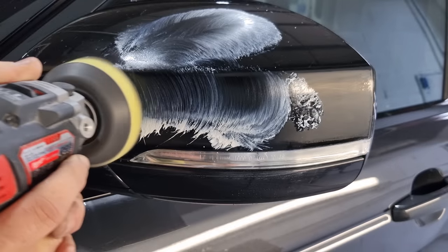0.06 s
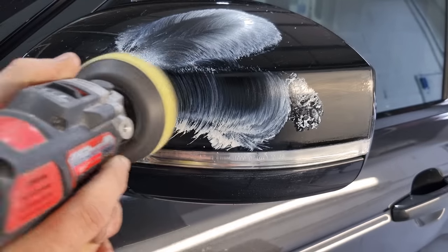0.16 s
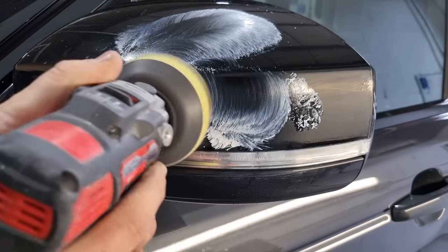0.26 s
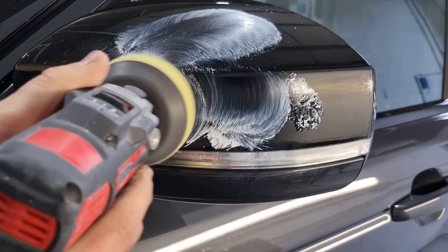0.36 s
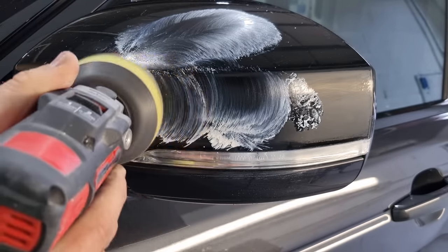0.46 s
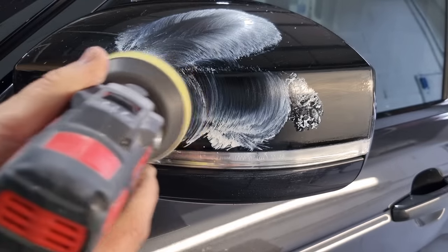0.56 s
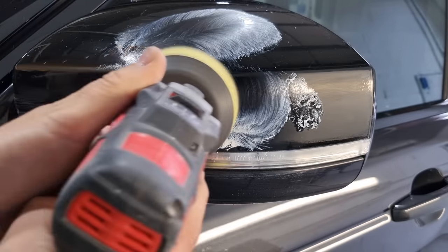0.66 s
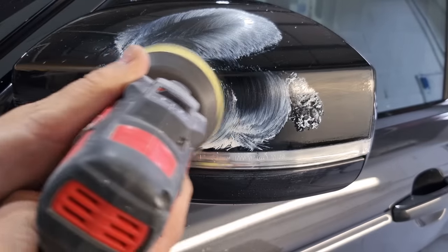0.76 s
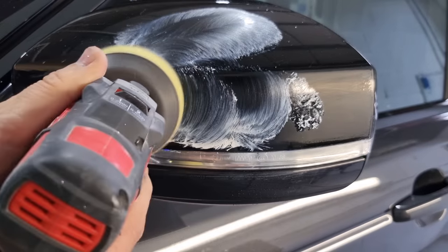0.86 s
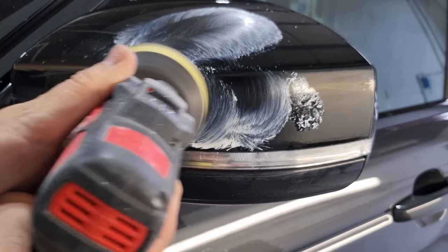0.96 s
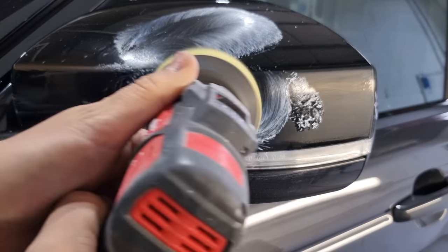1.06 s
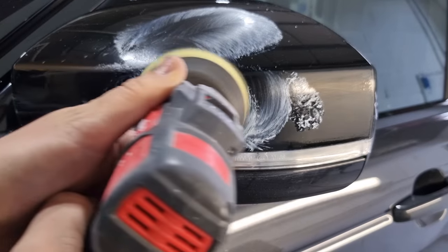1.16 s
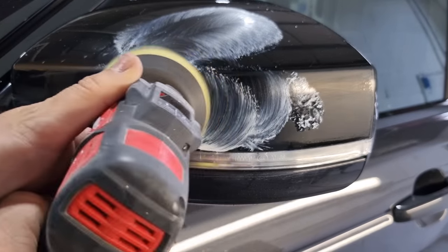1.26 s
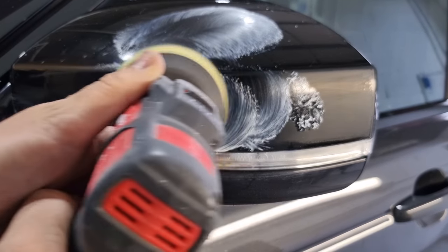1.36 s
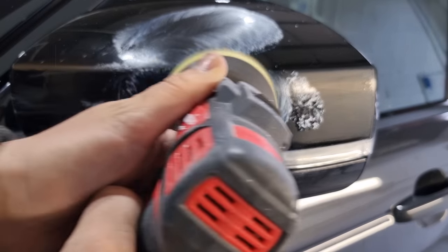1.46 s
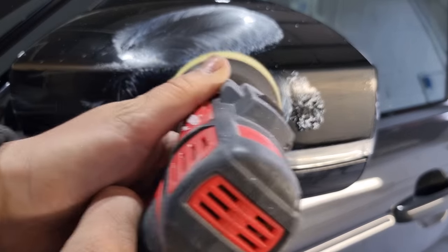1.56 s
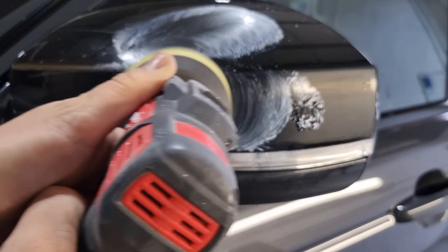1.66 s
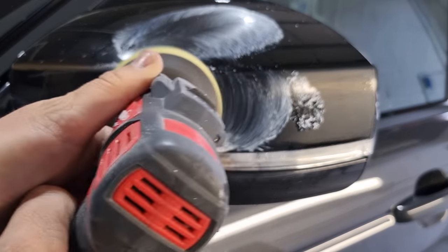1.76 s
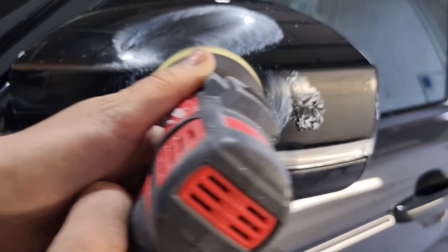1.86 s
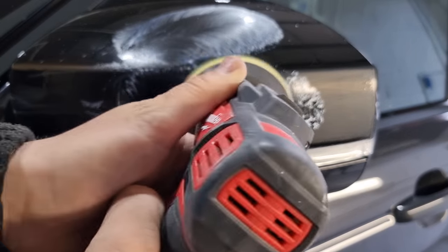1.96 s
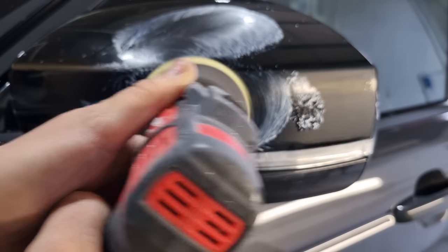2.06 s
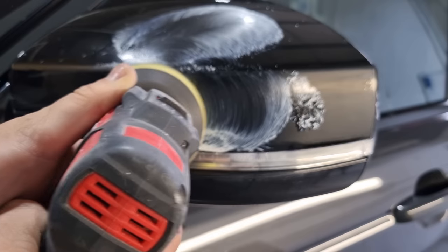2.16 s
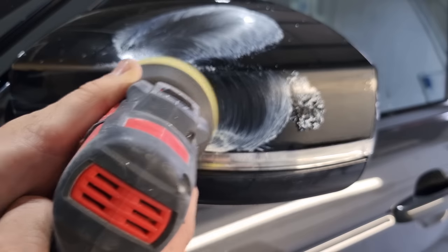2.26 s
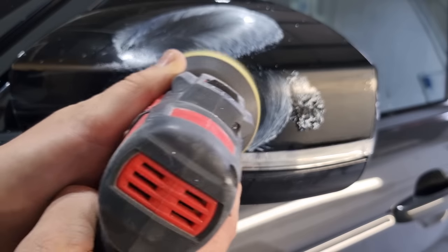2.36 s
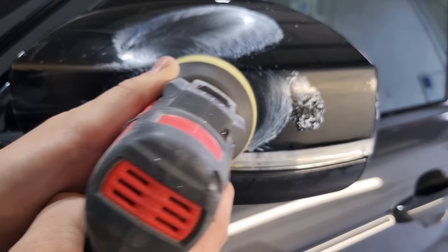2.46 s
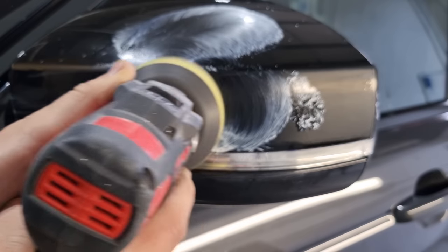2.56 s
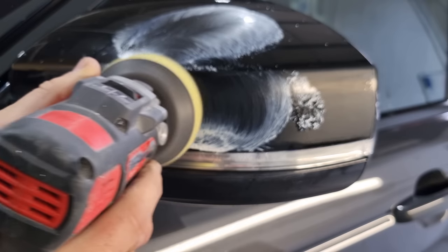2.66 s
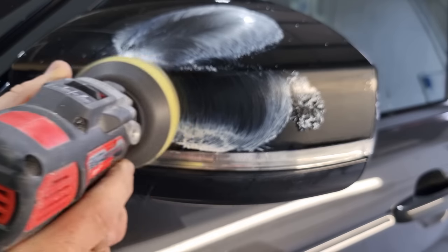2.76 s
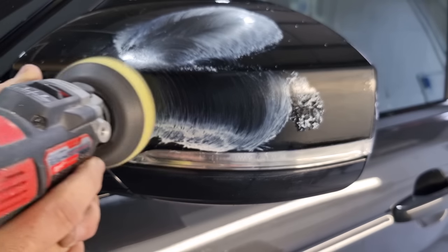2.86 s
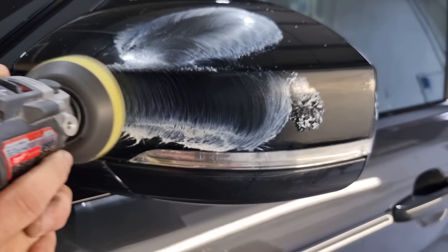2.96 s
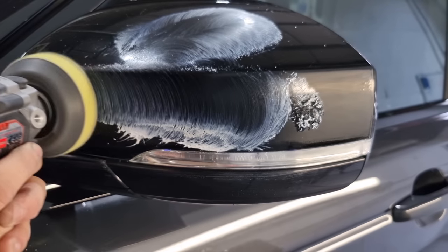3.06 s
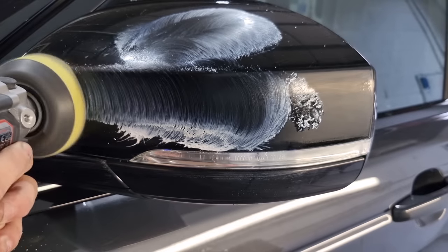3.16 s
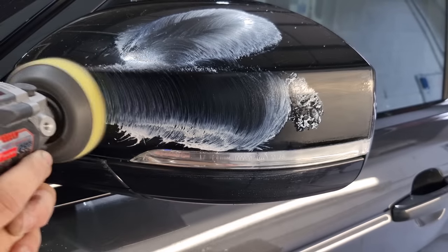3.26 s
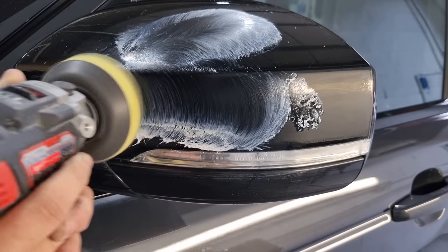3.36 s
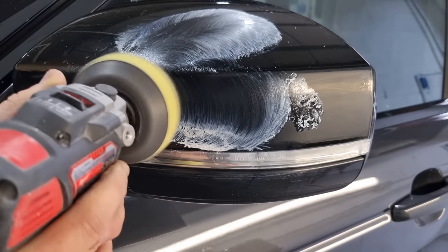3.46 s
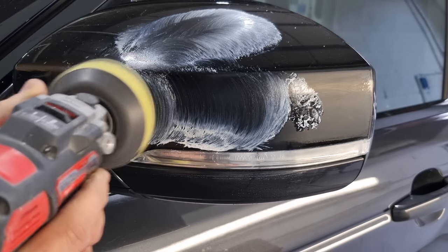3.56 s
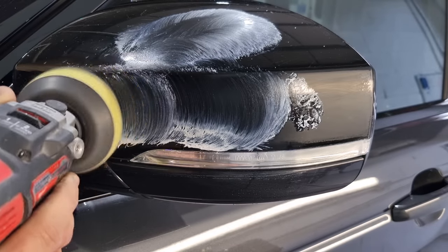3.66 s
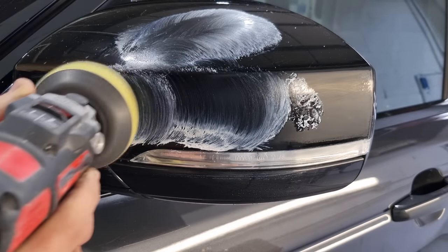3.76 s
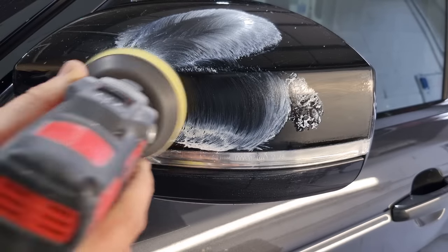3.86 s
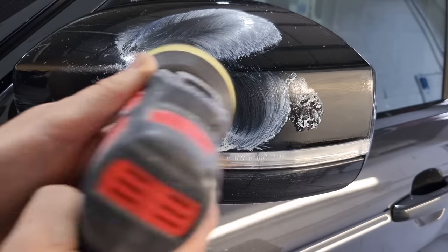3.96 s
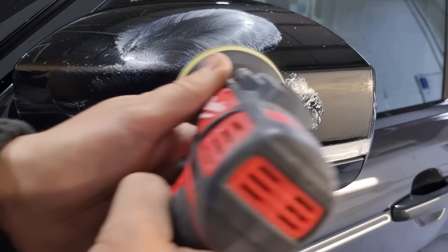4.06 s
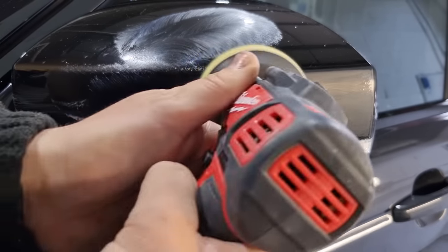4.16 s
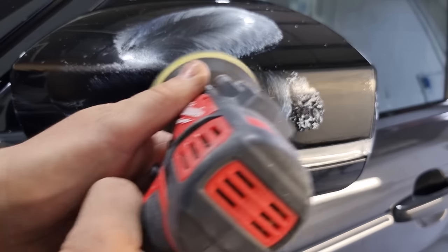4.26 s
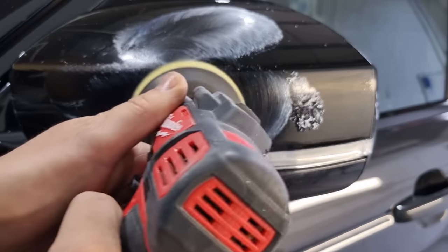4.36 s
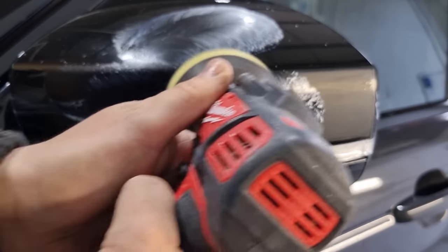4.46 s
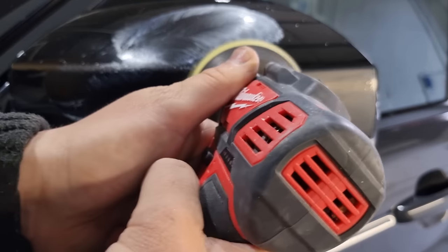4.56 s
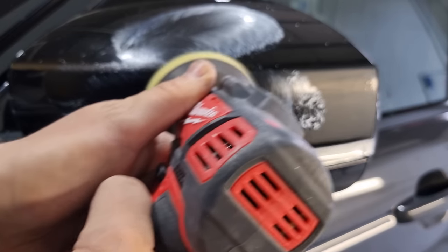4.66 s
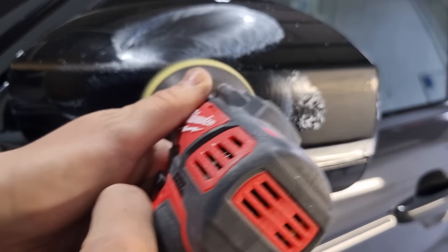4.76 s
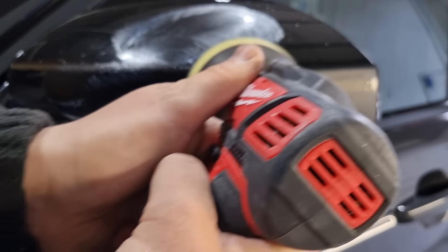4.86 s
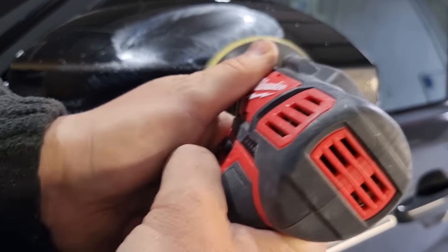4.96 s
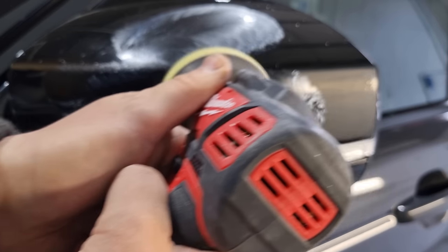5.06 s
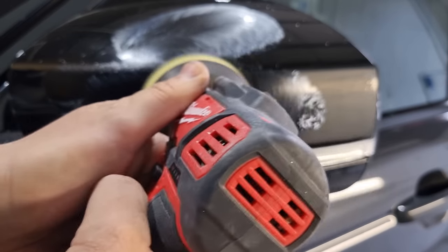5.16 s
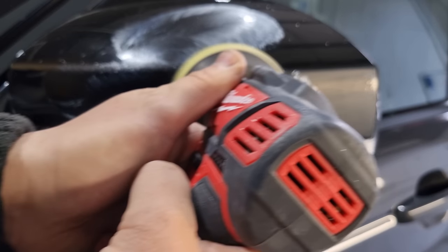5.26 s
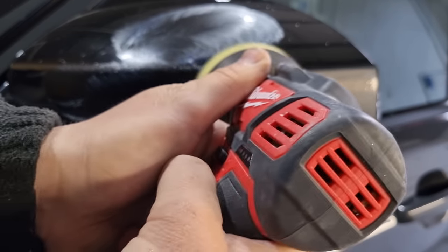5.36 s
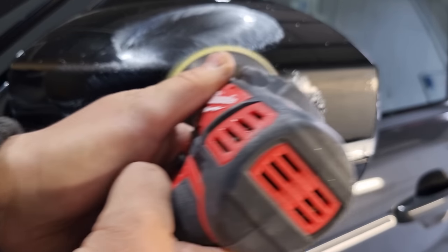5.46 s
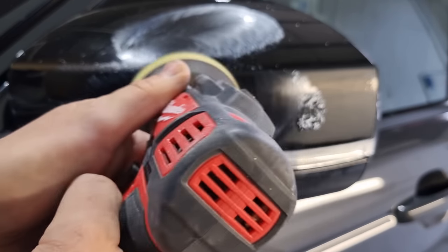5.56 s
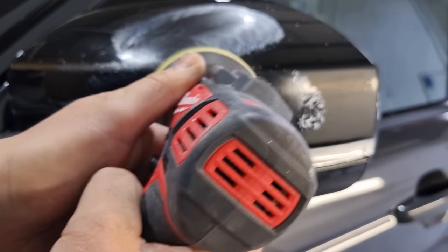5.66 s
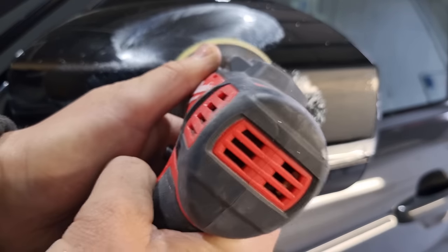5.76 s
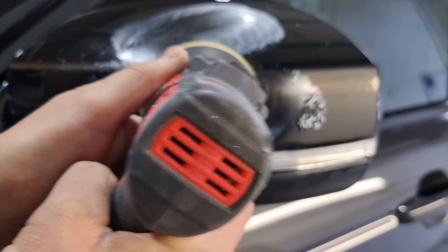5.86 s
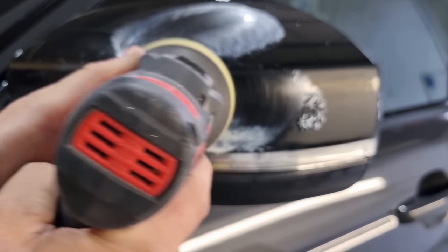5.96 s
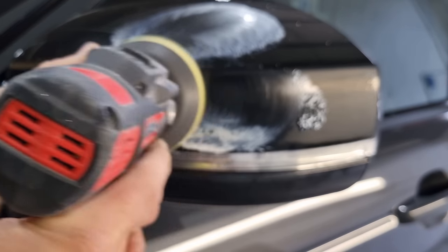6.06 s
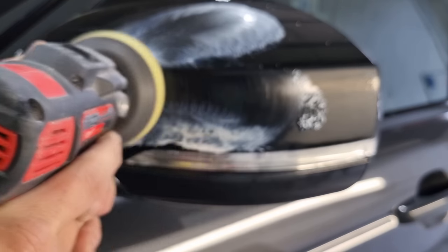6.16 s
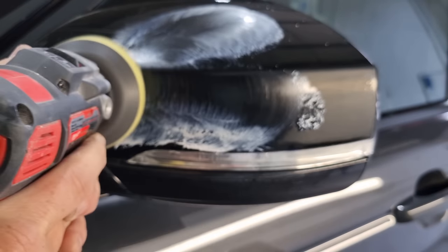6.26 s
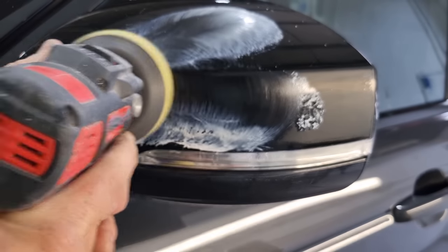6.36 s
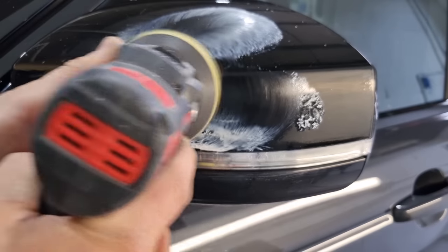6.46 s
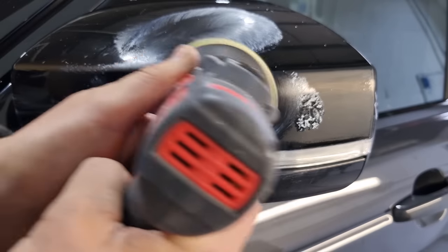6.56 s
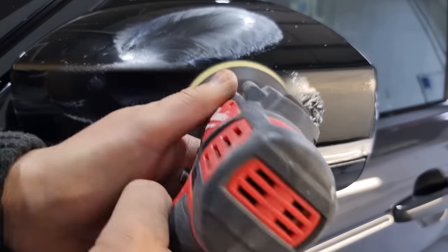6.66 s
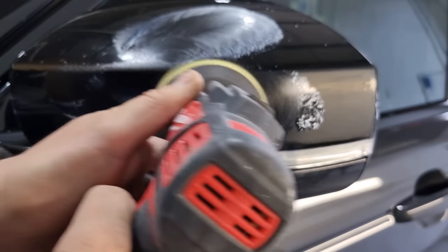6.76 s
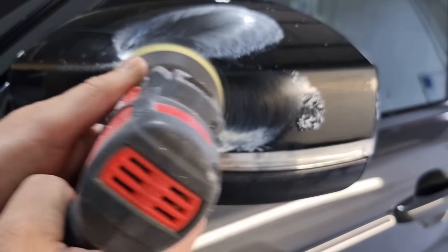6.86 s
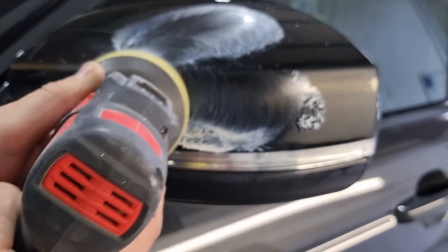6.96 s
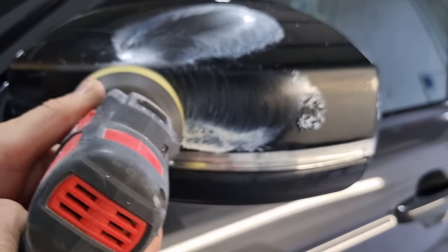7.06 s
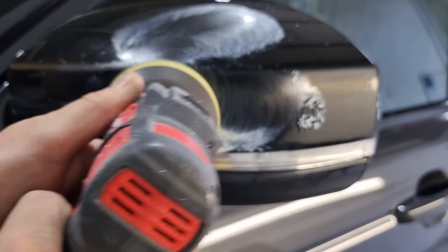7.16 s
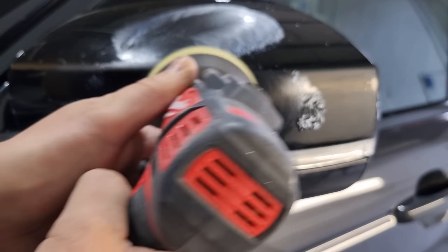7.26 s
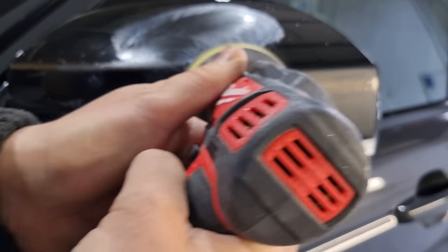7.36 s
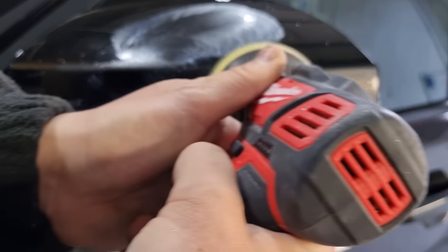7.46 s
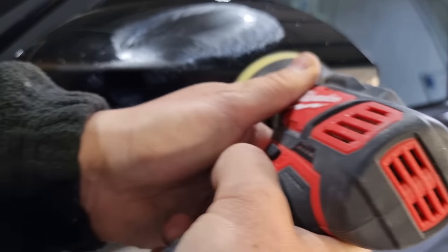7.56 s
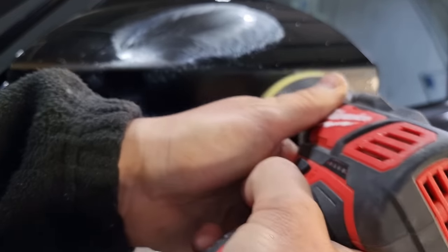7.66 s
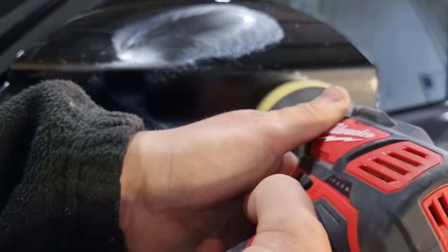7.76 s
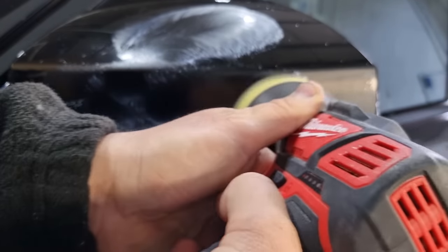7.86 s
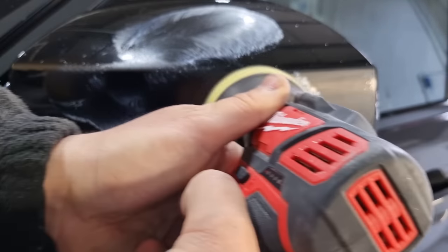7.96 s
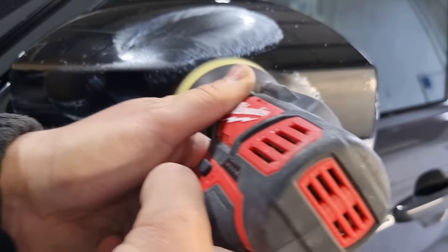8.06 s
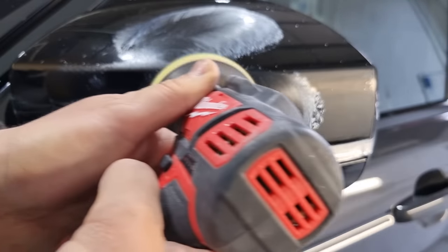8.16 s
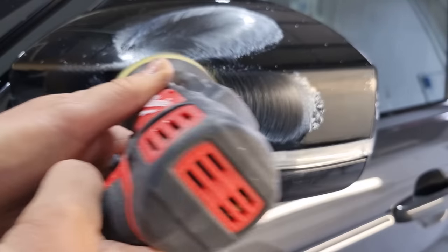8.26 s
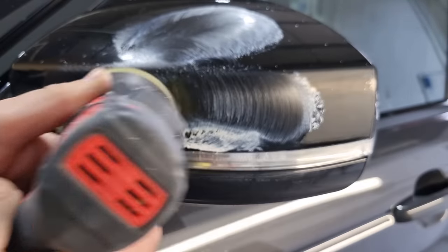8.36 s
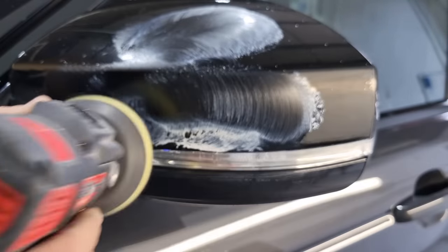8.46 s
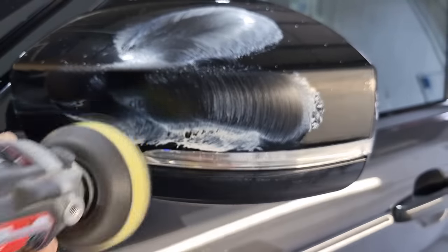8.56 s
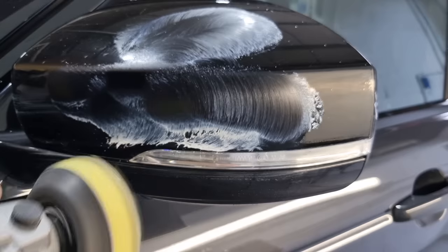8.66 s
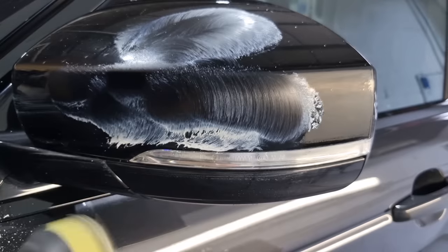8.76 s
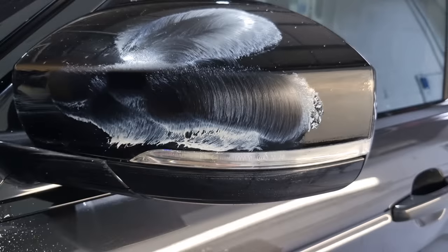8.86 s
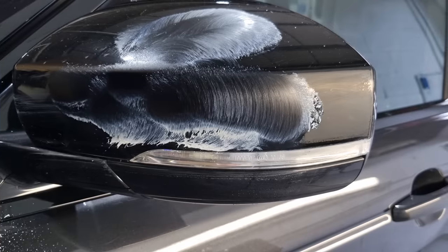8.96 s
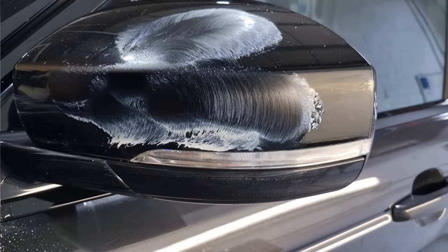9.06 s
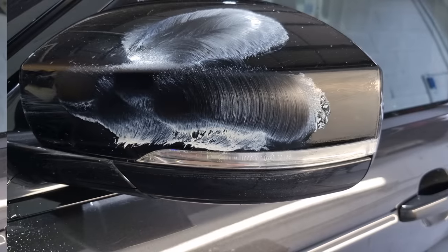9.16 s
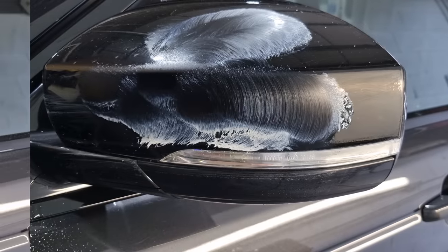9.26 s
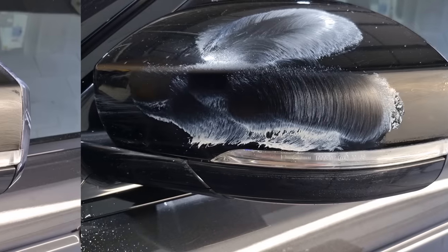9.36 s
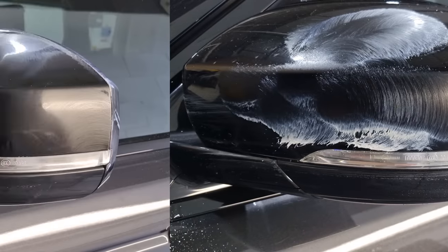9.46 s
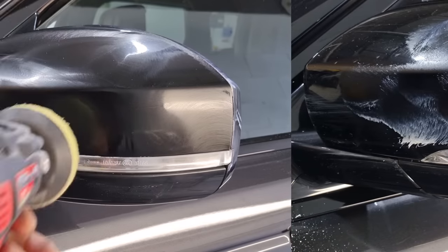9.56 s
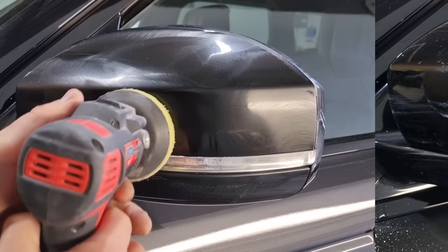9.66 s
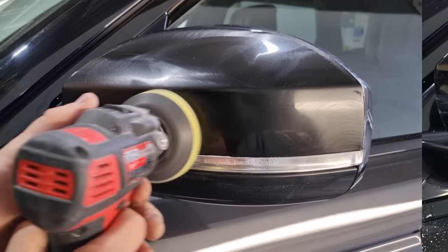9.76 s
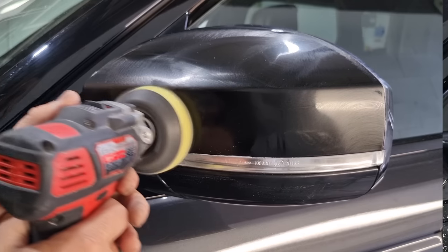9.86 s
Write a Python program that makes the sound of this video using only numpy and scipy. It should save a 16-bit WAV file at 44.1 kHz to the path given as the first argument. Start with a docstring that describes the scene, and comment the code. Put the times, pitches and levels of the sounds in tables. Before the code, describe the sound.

Nearly constant high motor whirr from a handheld buffing tool, heard at close range indoors. Small pitch dips and gentle fluttering follow the pad strokes over painted metal. Near the end the pad edge hisses as it lifts away, the motor quickly slows through falling tones to rest, and only low distant room rumble remains. A few dry handling clicks come before an abrupt restart at a slower speed.

```python
"""The whir of a small cordless polisher is heard first, close to a two-port microphone, buffing painted metal in a
workshop. Its motor orders, pad throb and commutator tones are sines locked to the shaft angle; its brush, gear and
fan noise is filtered noise, modulated by shaft and pad and ringing in the housing. Each push of the pad lowers the
speed. Switched off, it coasts to rest; after a few trigger clicks it spins up again at a lower speed."""
import sys
import numpy as np
from scipy import signal
from scipy.fft import rfft, irfft, next_fast_len
from scipy.io import wavfile
from scipy.ndimage import uniform_filter1d, map_coordinates

SR = 44100
rng = np.random.default_rng(int(sys.argv[2]) if len(sys.argv) > 2 else 0)


def materialize(psi):
    """Save the field psi as 16-bit PCM at rate SR to the path in sys.argv[1].

    A 1-D psi becomes a single channel; in a 2-D psi each row is a channel.
    """
    bounded = np.clip(np.atleast_2d(psi).T, -1, 1)
    quanta = np.round(bounded * 32767).astype(np.int16)
    wavfile.write(sys.argv[1], SR, quanta)


N = 437031

OFF_S, ON_S = 8.293, 9.733  # trigger let go, pressed again
FREE_HZ = 361.5  # shaft turns per second with the pad barely touching


def amp(db):
    """Level to amplitude: 20 dB is a factor of ten."""
    return 10 ** (np.asarray(db) / 20)


def unit(x):
    """Normalisation to a root-mean-square of 1."""
    return x / np.sqrt(np.mean(x ** 2) + 1e-20)


def along(points, hz):
    """Spectral interpolation of (f/Hz, value) points on a logarithmic frequency axis."""
    f, v = np.transpose(points)
    return np.interp(np.log(hz + 1), np.log(f + 1), v)


def curves(rows):
    """Linear interpolation in time: one value per sample for each column after t/s."""
    s, *columns = np.transpose(rows)
    return [np.interp(np.arange(N) / SR, s, column) for column in columns]


def wobble(rate):
    """Slow random fluctuation: a smooth curve through `rate` random knots a second."""
    coarse = np.arange(0, N + 64, 64)
    knots = rng.standard_normal(int(N * rate / SR) + 4)
    return np.interp(np.arange(N), coarse, map_coordinates(knots, [coarse * rate / SR]))


def filtered(x, response):
    """Linear filtering: the spectrum of x is multiplied by a complex response of frequency."""
    m = next_fast_len(N + 8192)
    return irfft(rfft(x, m) * response(np.fft.rfftfreq(m, 1 / SR)), m)[..., :N]


def noise(patchy_db):
    """Non-stationary noise: two unrelated white noises share one time-frequency field of random gains."""
    z = signal.stft(rng.standard_normal((2, N)), nperseg=512)[2]
    field = uniform_filter1d(rng.standard_normal(z.shape[1:]), size=6, axis=0)
    field = uniform_filter1d(field, size=14, axis=1)
    return signal.istft(z * amp(patchy_db * unit(field)), nperseg=512)[1][:, :N]


def ports(pair):
    """Spatial coherence: a shared and an unshared signal reach two ports, unlike in phase and level."""
    # likeness of the ports for a pair of equal power: f/Hz, coherence
    alike = [(60, 0.23), (200, 0.98), (350, 0.64), (800, 1), (1400, 0.74), (1900, 0.2), (3700, 0.57),
             (7000, 0.15), (11000, 0.27), (12700, 1), (15000, 0.54)]
    # phase by which the left port leads: f/Hz, lead/rad
    lead = [(1, 1.5), (170, 0), (290, 1.7), (600, 2), (1120, 2), (2240, 3), (2670, 5), (2930, 4.5),
            (4820, 5), (5600, 3.5), (6370, 6.5), (8000, 5.5), (15700, 7)]
    # level difference of the ports: f/Hz, left minus right/dB
    lean = [(60, -3), (150, -6.5), (380, 9.5), (950, 4), (2380, 1), (5980, 1.5), (15000, 3)]

    def split(hz):
        turn = np.arccos(np.clip(along(alike, hz), 0, 1)) / 2
        return np.array([np.cos(turn), np.sin(turn)])

    shared, own = filtered(pair, split)
    side = np.array([[1], [-1]])

    def offset(hz):
        return amp(side * along(lean, hz) / 2) * np.exp(.5j * side * along(lead, hz))

    return filtered(shared + side * own, offset)


def workshop():
    """Coherent and incoherent noise: distant rumble, nearly alike at both ports, over faint unrelated air."""
    # spectrum of the rumble: f/Hz, relative level/dB
    rumble_colour = [(15, -26), (32, 0), (44, -17), (62, 6.5), (88, -6.5), (150, -15.5), (300, -12.5),
                     (480, -41)]
    # rise and fall of the rumble: t/s, level/dB
    swell = [(0, -53), (8.6, -57.5), (9.0, -59), (9.35, -61.5), (9.55, -56), (9.75, -52), (9.91, -51)]
    # spectrum of the workshop air: f/Hz, relative level/dB
    air_colour = [(200, -36), (400, -12.5), (650, -11.5), (1560, -35.5), (3300, -20.5), (8000, -42),
                  (16000, -39)]
    mid, side = filtered(noise(patchy_db=1), lambda hz: amp(along(rumble_colour, hz))) * [[1], [.3]]
    rumble = unit(np.array([mid + side, mid - side]))
    air = unit(filtered(noise(patchy_db=1.5), lambda hz: amp(along(air_colour, hz))))
    return amp(curves(swell)[0]) * rumble + amp(-62.5) * air


def clicks():
    """Damped resonance: each touch is a short puff of noise in one broad resonance of grip or switch."""
    # handling and trigger: t/s, level before the onset ramp and decay/dB, centre f/Hz, width/Hz, t60/s
    touches = [(9.477, -35.5, 663, 260, 0.04), (9.548, -47, 550, 600, 0.08),
               (9.640, -29, 2280, 2500, 0.051), (9.643, -43, 2750, 4000, 0.011),
               (9.677, -33, 1100, 2200, 0.036), (9.679, -44, 292, 120, .08),
               (9.683, -44, 3000, 8000, 0.021), (9.738, -34, 3030, 9000, 0.016),
               (9.746, -41, 285, 110, 0.18)]
    out, t = np.zeros(N + SR), np.arange(SR // 10) / SR
    f = np.fft.rfftfreq(len(t), 1 / SR)
    for s, db, hz, width_hz, t60 in touches:
        band = 1j * f * width_hz / (hz * hz - f * f + 1j * f * width_hz)
        puff = unit(irfft(rfft(rng.standard_normal(len(t))) * band ** 2))
        onset = 1 - np.exp(-t / .001)
        out[round(s * SR):][:len(t)] += amp(db - 60 * t / t60) * onset * puff
    return out[:N]


def shaft():
    """Torque balance: the shaft sags under each push, is braked by friction and fan, then spins up (turns/s)."""
    # pushes of the pad onto the paint: t/s, sag of shaft speed/Hz, half length/s
    pushes = [(0, 9, .25), (.33, 4, .2), (.57, 6, .17), (.96, 8.5, .2), (1.37, 10.5, .23),
              (1.82, 11.5, .23), (2.26, 11, .24), (2.66, 8, .2), (2.87, 7, .25), (3.14, 16.5, .24),
              (3.38, 11, .22), (3.76, 12, .33), (4.13, 3.5, .15), (4.45, 12.5, .2), (4.83, 15, .22),
              (5.24, 10.5, .21), (5.66, 11, .19), (6.05, 4, .2), (6.33, 16, .33), (6.9, 13, .28),
              (7.15, 11, .22), (7.73, 12, .18), (8.27, 13, .42)]
    friction_hz_per_s, drag_equal_hz = 228, 253  # bearing braking; speed at which the fan brakes as hard
    slow_hz, spin_up_s, spin_up_bend = 291, .05, .6  # second run: speed, time constant, exponent
    t = np.arange(N) / SR
    run = FREE_HZ
    for s, sag_hz, half in pushes:
        run = run - sag_hz * np.cos(np.pi / 2 * np.clip((t - s) / half, -1, 1)) ** 2
    # constant friction plus drag as speed squared gives a tangent law
    start_angle = np.arctan(run[round(OFF_S * SR)] / drag_equal_hz)
    angle = start_angle - friction_hz_per_s / drag_equal_hz * (t - OFF_S)
    coast = drag_equal_hz * np.tan(np.clip(angle, 0, 1))
    again = slow_hz * (1 - np.exp(-np.maximum(t - ON_S, 0) / spin_up_s)) ** spin_up_bend
    return np.where(t < OFF_S, run, np.where(t < ON_S, coast, again))


def state(speed):
    """Level superposition: the seven factors on which decibel levels depend linearly, and dB of distance."""
    # how the tool is held: t/s, flank towards the microphone (0-1), rear vents towards it (0-1)
    hold = [(0, 0.6, 0), (.7, 0.18, 0.13), (1.3, 0.05, 0.2), (1.8, 0.07, 0.33), (2.3, 0.15, 0.34),
            (2.7, 0.32, 0.03), (3.1, 0.69, 0.1), (3.6, 0.45, 0.13), (3.9, 0.35, 0.15), (4.2, 0.06, 0.6),
            (4.5, 0.1, 0.67), (5, 0.12, 0.94), (5.4, 0.13, 0.78), (5.8, 0.15, 0.62), (6.25, 0.45, 0.03),
            (6.8, 0.13, 0.54), (7.15, 0.26, 0.32), (7.5, 0.07, 0.78), (7.95, 0.19, 0.81), (8.2, 0.03, 0.97)]
    current_dies_s = 0.32  # time constant after switch-off
    away_s, away_db_per_s = 8.11, 8.5  # the tool is carried off
    t = np.arange(N) / SR
    first, again = t < OFF_S, t >= ON_S
    off = ~again * (1 - np.exp(-np.maximum(t - OFF_S, 0) / current_dies_s))
    flank, vents = curves(hold)
    load = first * (1 - np.clip(flank, 0, 1)) * (FREE_HZ - speed) / 10  # heard less from the flank
    halvings = np.log2(FREE_HZ / np.maximum(speed, 2))
    away_db = -away_db_per_s * np.maximum(t - away_s, 0) * ~again
    return np.array([np.ones(N), flank, vents, load, halvings, off, again]), away_db


def modulators(turns):
    """Amplitude modulation: pad throb at a tenth of shaft speed, shaft chop, random crackle and a slow drift."""
    throb = np.cos(2 * np.pi * turns / 10) + .5 * np.cos(2 * np.pi * turns / 5 + 0.72)
    chop = np.cos(4 * np.pi * turns) + 0.5 * np.cos(6 * np.pi * turns + 2.0)
    hits = (rng.random(N) < 400 / SR) * rng.random(N)  # 400 a second on average
    crackle = signal.lfilter([1], [1, -np.exp(-1 / (0.0018 * SR))], hits)  # decay constant 1.8 ms
    return throb, chop, crackle, wobble(11)


def layer(colour, level_db, beat, by_pad, by_crackle):
    """Source and filter: modulated noise shaped by a spectrum and set to a level that drifts a little."""
    throb, chop, crackle, drift = beat
    drive = noise(patchy_db=1.2) * (1 + by_pad * throb + 0.16 * chop + by_crackle * crackle)
    shaped = unit(filtered(drive, lambda hz: amp(along(colour, hz))))
    return amp(level_db + 0.48 * drift) * shaped


def hands(beat):
    """Friction noise: hands rustle as a broad band, roughened by the same random crackle as the motor noise."""
    # hands on the resting tool: t/s, level/dB
    rustle = [(9.3, -66.5), (9.45, -66), (9.53, -73), (9.6, -55), (9.7, -49), (9.725, -51), (9.75, -64)]
    # spectrum of the rustle: f/Hz, relative level/dB
    cloth = [(350, -36), (600, -9), (744, -16), (1010, -7), (2340, -5), (10300, -28), (15000, -30)]
    return layer(cloth, curves(rustle)[0], beat, by_pad=0, by_crackle=.6)


def pad_edge(beat):
    """Friction noise: the pad's edge hisses as it comes off the paint."""
    # lift-off: t/s, level/dB
    lift_off = [(7.9, -60), (8.05, -28), (8.14, -26), (8.28, -29), (8.35, -45), (8.5, -80)]
    # spectrum of the hiss: f/Hz, relative level/dB
    edge = [(3000, -48), (4200, -5.5), (5500, -6), (6600, -2), (7300, -8), (9000, -36)]
    return layer(edge, curves(lift_off)[0], beat, by_pad=.05, by_crackle=.4)


def coasting_noise(beat):
    """Rolling and meshing noise: the free bearings whirr in two bands and the slowing gears murmur."""
    # whirr of the bearings: t/s, level of its body/dB, level of its upper band/dB
    coasting = [(8.3, -70, -60), (8.4, -50, -38), (8.5, -45, -35), (8.55, -35, -40), (8.62, -31.5, -35),
                (8.72, -33.5, -42), (8.85, -39.5, -47.5), (8.92, -44, -51), (8.97, -58, -48),
                (9.01, -50, -46), (9.08, -62, -53), (9.16, -66, -52.5), (9.22, -68, -64), (9.4, -88, -91)]
    # murmur of the gears: t/s, level/dB
    slowing = [(8.3, -60), (8.5, -40), (8.7, -52), (8.9, -53), (9.05, -56), (9.17, -55), (9.3, -74),
               (9.45, -85)]
    # spectra of body, upper band and murmur: f/Hz, relative level/dB
    body = [(1500, -43), (2000, -7), (2500, -2), (2900, 0.5), (3150, 0.5), (3400, -16), (4000, -46)]
    upper = [(3000, -34), (3450, -4.5), (3850, -1.5), (4150, -8.5), (5000, -41)]
    murmur = [(300, -32), (550, -6), (800, 0), (1050, 1), (1200, -16), (1500, -36)]
    levels = [*curves(coasting), *curves(slowing)]
    return sum(layer(colour, db, beat, .15, .4) for colour, db in zip([body, upper, murmur], levels))


def gliding_orders(turns):
    """Falling tones: shaft orders fade in and out one after another as the motor slows, as listed."""
    # glides: multiple of shaft speed, start t/s, end t/s, first level/dB, last level/dB
    glides = [(2, 8.33, 8.44, -33, -50), (3, 8.36, 8.62, -30, -45), (3, 8.66, 8.78, -49, -53),
              (18, 8.36, 8.46, -33, -40), (4, 8.43, 8.59, -45, -49), (5, 8.57, 8.63, -42, -43),
              (6, 8.66, 8.72, -44, -45), (6, 8.74, 8.83, -47, -51), (5, 8.78, 8.89, -51, -53),
              (9, 8.79, 8.93, -43, -46), (6, 8.85, 8.99, -44, -55), (12, 8.91, 9.03, -49, -55),
              (15, 8.97, 9.1, -50, -55)]
    fade_s = .02
    t, out = np.arange(N) / SR, 0
    for k, start, end, first_db, last_db in glides:
        fade = np.clip(np.minimum(t - start, end - t) / fade_s, 0, 1)
        level_db = np.interp(t, [start, end], [first_db, last_db]) + 1.8 * wobble(25)
        out = out + fade * amp(level_db) * np.sin(2 * np.pi * (k * turns + .06 * wobble(40)))
    return out


def rotor(beat, now, away_db):
    """Resonant radiation: brush, gear and fan noise rings in the housing; returns vent ring and the rest."""
    # spectra of the seven layers: f/Hz, relative level/dB
    growl = [(150, -39), (250, -18.5), (500, -14.5), (850, -3), (1000, -4.5), (1200, 0), (1350, 3),
             (1600, -49)]
    drone = [(1200, -51), (1400, -0.5), (1500, 2.5), (1700, -3), (1800, -2.5), (2100, -67)]
    buzz = [(1500, -44), (1800, -2), (1950, 0), (2400, -1.5), (3300, -23), (4500, -35)]
    ring = [(2200, -56), (2560, 4), (2660, 7), (2760, 2), (3000, 2.5), (3200, -3), (3600, -53)]
    upper_ring = [(2600, -35), (2750, -2), (2830, 9.5), (2900, -6), (3050, -28.5)]
    rasp = [(2500, -37), (3300, 0.5), (3800, 0), (4600, -4), (5400, -3.5), (6300, -3.5), (7000, -8),
            (8000, -13), (10000, -69)]
    hiss = [(6000, -78), (8200, -6.5), (9200, -6), (10500, -6), (11500, -3.5), (12400, 2.5), (13300, 1.5),
            (15500, -7), (16500, -9.5)]
    # one row per layer, in that order: level at free speed/dB, flank on/dB, vents on/dB,
    # per 10 Hz of sag/dB, per halved speed/dB, without current/dB, in the second run/dB
    rules = [(-32.5, -3, 3, 1, -4, -10, -5), (-27.5, -18, 0, 0, -6.5, -11, -9),
             (-27, -5, 1, 0, -6, -6.5, -6.5), (-30, 3.5, 2.5, 0.075, -5, -9, -14),
             (-39, 15, 9, 0, -8, -10, -15), (-25.5, -2.5, 0.5, 1, -6.5, -9.5, -5.5),
             (-27, -6, 1, 0.088, -7.5, -10, -8.5)]
    surge_db, surge_s = 8.5, 0.021  # starting current: level and time constant
    surge = surge_db * now[-1] * np.exp(-np.abs(np.arange(N) / SR - ON_S) / surge_s)
    levels = np.dot(rules, now) + away_db + surge
    # spectrum, depth of pad throb, depth of crackle
    layers = [(growl, .04, .15), (drone, .04, .2), (buzz, .04, .2), (ring, .05, .3),
              (upper_ring, .05, .3), (rasp, .05, .4), (hiss, .04, .4)]
    out = [layer(colour, db, beat, by_pad, by_crackle)
           for db, (colour, by_pad, by_crackle) in zip(levels, layers)]
    vent_ring = out.pop(3) + out.pop(3)
    return vent_ring, sum(out)


def tones(speed, turns, now):
    """Order analysis: slightly unsteady sines at multiples of shaft speed, strong, low and commutator orders."""
    # 1st, 2nd and 3rd order: level at free speed/dB, flank on/dB, vents on/dB,
    # per 10 Hz of sag/dB, per halved speed/dB, without current/dB, in the second run/dB
    orders = [(-31, -15, -1, 0, -26, -1, -3), (-33, -1, -10, 1, -20, -16, 3), (-43, 4, 7, -1, -14, -25, 8)]
    # pad unbalance and by-tones: multiple, level at full speed/dB, flank on/dB, vents on/dB, blur/Hz
    by_tones = [(.1, -50.5, -2, 0, .5), (.2, -49.5, -5, 0, .5), (.73, -62, 15, 0, 9), (.89, -58, 16, 0, 7),
                (1.1, -56, 8, 0, 7), (2.6, -47, -4, 7, 6), (3.23, -40, -5, 7.5, 2), (3.46, -43, -4, 6, 10),
                (4, -43, 2, -6, 4)]
    # the casing's response to the by-tones: f/Hz, relative level/dB
    panel = [(1080, 0), (1125, -9), (1160, 2), (1200, 0)]
    # commutator and fan orders: multiple, level/dB, flank on/dB, per 10 Hz of sag/dB
    whine_orders = [(9, -37, 14, -1), (12, -33, -13, 5.5), (14, -32.5, -12, 1), (15, -38, -9, 0),
                    (17, -39, -8, 0)]
    # level change common to these orders, same columns as the 1st to 3rd order
    whine_rule = (0, 0, -7, 0, -30, -4, -5)
    body_hz = 250  # the small body hardly radiates orders 1-3 below this
    unloaded_db = -14  # by-tones without current or in the second run
    flank, vents, load, off, again = now[1], now[2], now[3], now[5], now[6]

    def sine(k, blur_hz):
        wander = np.cumsum(blur_hz * wobble(30)) / SR
        return np.sin(2 * np.pi * (k * turns + wander + rng.random()))

    strong, low, whine = 0, 0, 0
    # the magnetic pull dies sooner than the brush noise
    pull = np.array([*now[:5], 1 - (1 - off) ** 8, again])
    for k, db in enumerate(np.dot(orders, pull)):
        flutter_db = (1.8 + 4 * flank * (k == 0)) * wobble(24)
        strong = strong + amp(db + flutter_db) * sine(k + 1, 2 + 3 * flank)
    for k, db, flank_db, vent_db, blur_hz in by_tones:
        level_db = db + flank_db * flank + vent_db * vents + 2 * wobble(5)
        low = low + amp(level_db) * sine(k, blur_hz)
    for k, db, flank_db, load_db in whine_orders:
        level_db = db + flank_db * flank + load_db * load + 1.5 * wobble(7)
        whine = whine + amp(level_db) * sine(k, 5)
    strong = filtered(strong, lambda hz: 1 - 1 / (1 + (hz / body_hz) ** 12))
    low = filtered(low, lambda hz: amp(along(panel, hz)))
    low = low * amp(unloaded_db * (off + again)) * (speed / FREE_HZ) ** 3
    return strong + low + whine * amp(np.dot(whine_rule, now))


def scene():
    """Point and extended sources: tones come from one point, noise from the whole housing, ring from a vent."""
    # the ring swells at the start and near the end of the pass: t/s, level/dB
    ring_swells = [(0, 4.5), (.3, 0.5), (7.45, 0), (7.7, 3), (8.05, 0), (8.3, -2.5)]
    vent_pan_db, vent_turn_db = -1, 9  # left minus right: at rest, added with vents on
    speed = uniform_filter1d(shaft(), size=400)
    turns = np.cumsum(speed) / SR
    now, away_db = state(speed)
    beat = modulators(turns)
    point = clicks() + gliding_orders(turns) + tones(speed, turns, now)
    ring, housing = rotor(beat, now, away_db)
    housing = housing + hands(beat) + pad_edge(beat) + coasting_noise(beat)
    pan = amp((vent_pan_db + vent_turn_db * now[2]) * [[.5], [-.5]])
    vent = ports(ring * amp(curves(ring_swells)[0])) * pan
    return workshop() + vent + ports(housing + point * [[1], [.3]])


def record(dry):
    """Band limitation: nothing at or above 15930 Hz is kept."""
    return filtered(dry, lambda hz: hz < 15930)


dry = scene()
out = record(dry)
materialize(out)
```